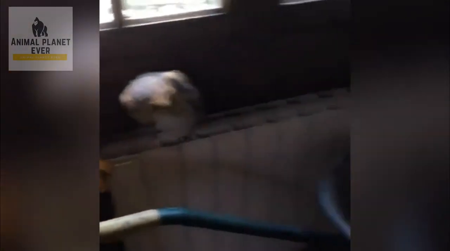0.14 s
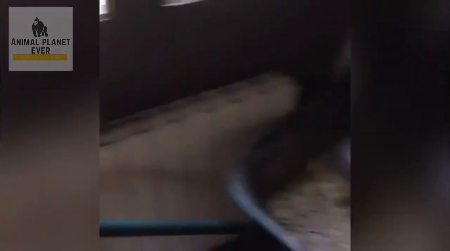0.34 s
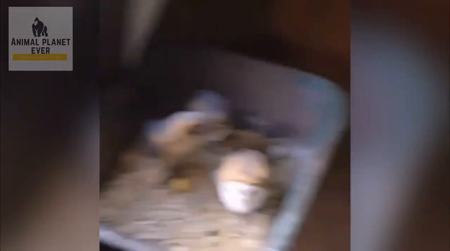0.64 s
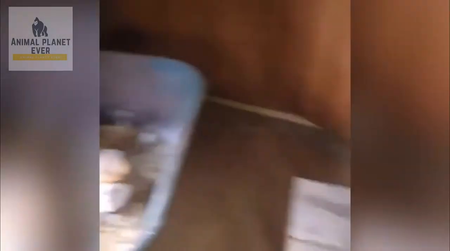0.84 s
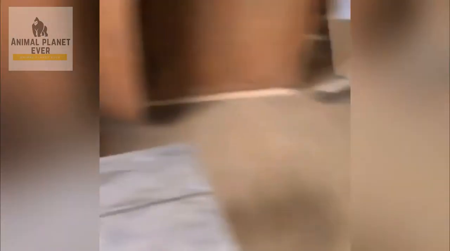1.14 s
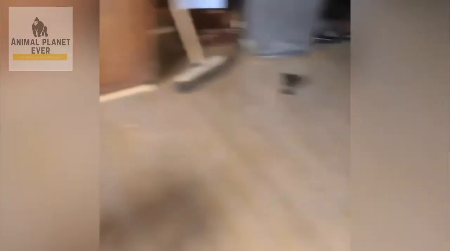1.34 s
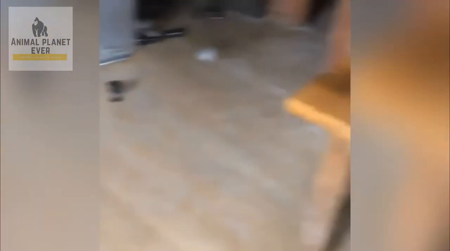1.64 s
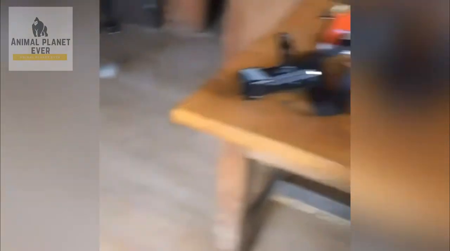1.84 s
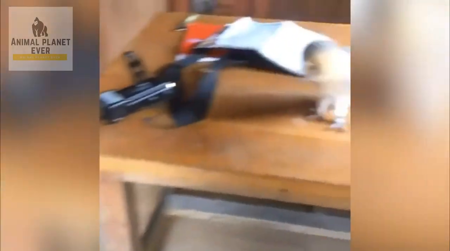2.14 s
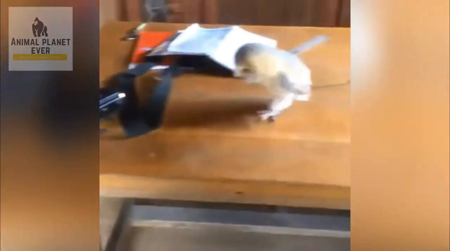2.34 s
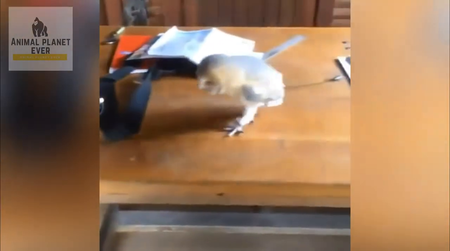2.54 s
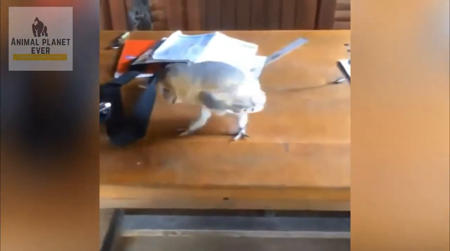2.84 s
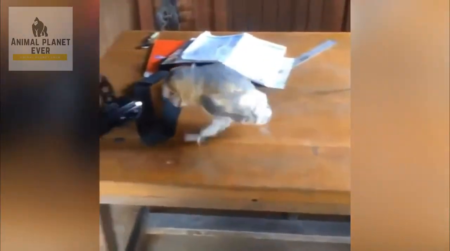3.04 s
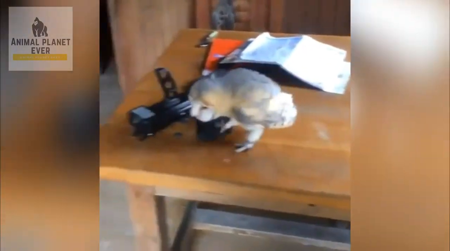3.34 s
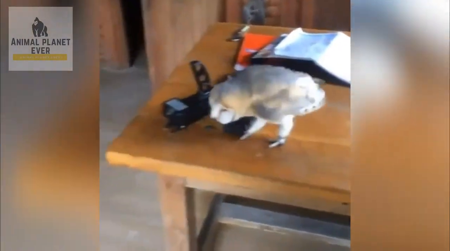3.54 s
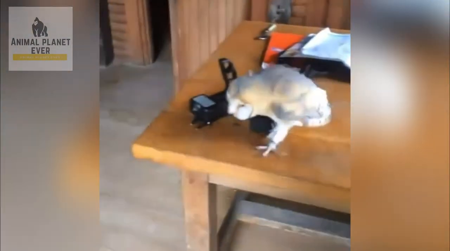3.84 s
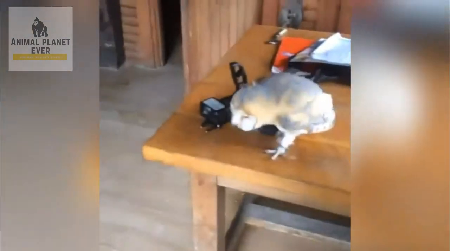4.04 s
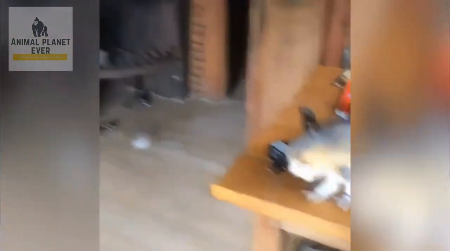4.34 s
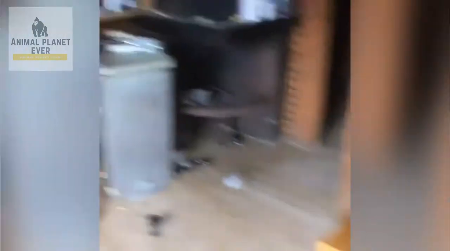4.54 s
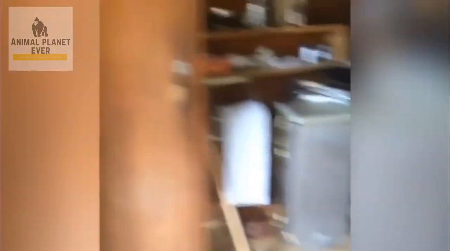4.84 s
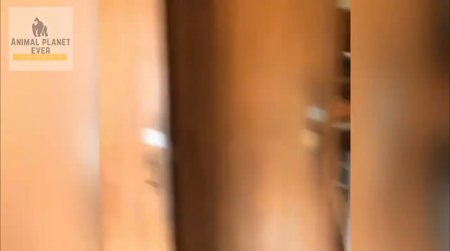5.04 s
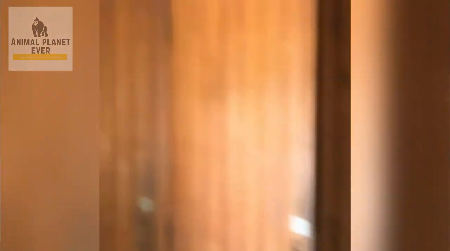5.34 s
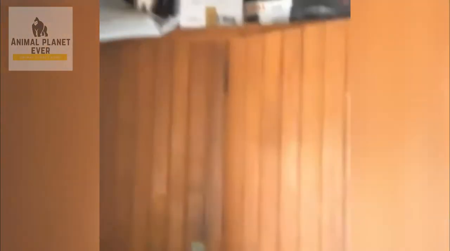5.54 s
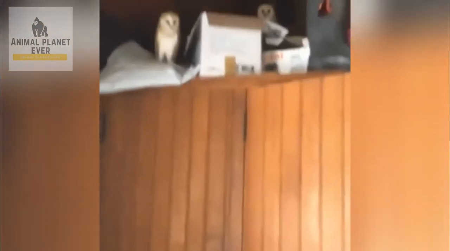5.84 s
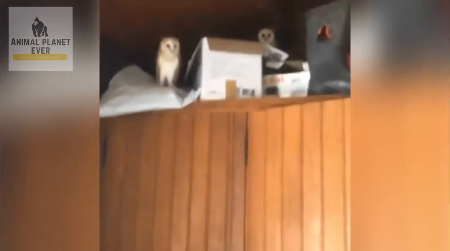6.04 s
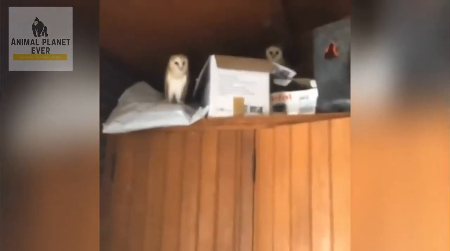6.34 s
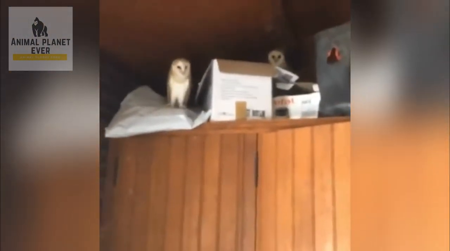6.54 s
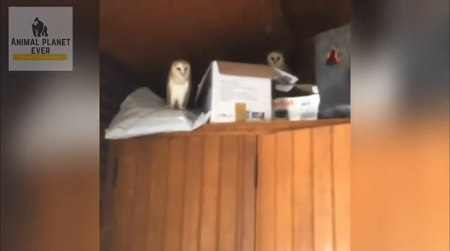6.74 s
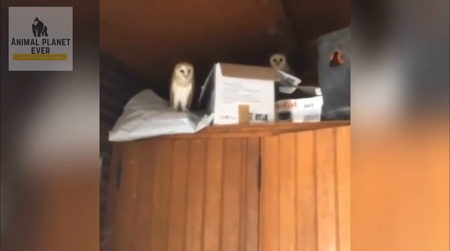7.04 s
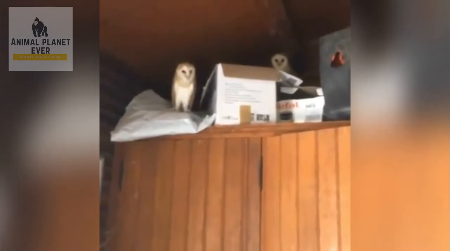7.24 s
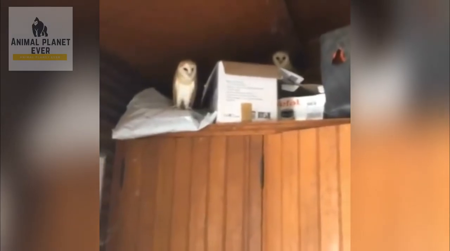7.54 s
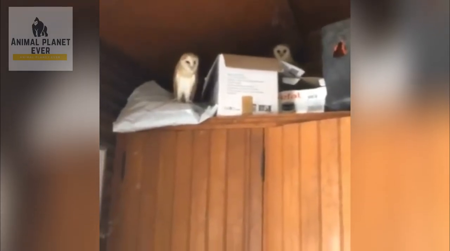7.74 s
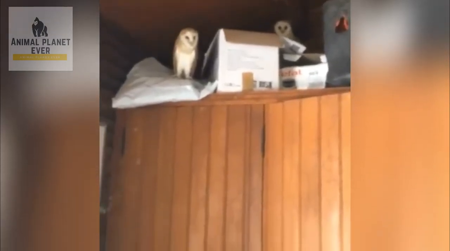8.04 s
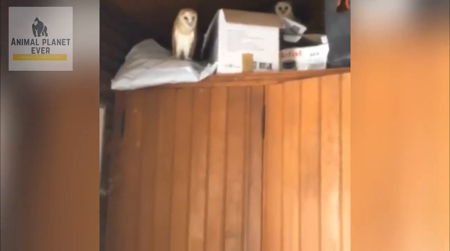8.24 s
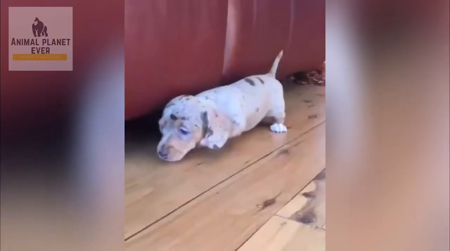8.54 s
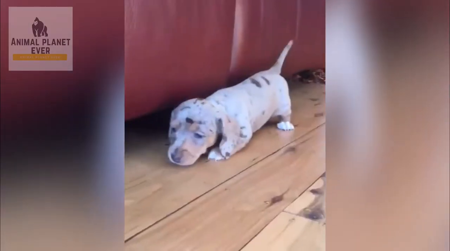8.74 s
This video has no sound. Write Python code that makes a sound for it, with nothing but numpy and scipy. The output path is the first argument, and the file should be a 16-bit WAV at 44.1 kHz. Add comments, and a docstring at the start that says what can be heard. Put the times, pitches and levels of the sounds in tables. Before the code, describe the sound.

Barn owls rasp out harsh, overlapping hisses in a small wooden room over faint rumble and handling bumps, then abrupt silence and quiet air.

```python
"""Barn owls hiss in a small wooden room over low rumble and still air, while someone walks about with a camera.
At first thin, hollow hisses alternate with full, rasping ones; later all are thin. Each is turbulent noise
shaped by throat and mouth resonances, and the boards echo it. Decaying tones bump the camera, noise bursts
make steps and a knock, and a wavering tone groans. Near the end all is cut off in mid hiss; after a silence
a quieter room follows, shaped noise in which a puppy's paw scuffs the floor."""
import sys
import numpy as np
from scipy import signal
from scipy.fft import rfft, irfft, next_fast_len
from scipy.io import wavfile
from scipy.ndimage import uniform_filter1d

SR = 44100
rng = np.random.default_rng(int(sys.argv[2]) if len(sys.argv) > 2 else 0)


def inscribe(sig):
    """Save sig as 16-bit PCM at rate SR to the path in sys.argv[1].

    A 1-D sig is mono; a 2-D sig holds one channel per row.
    Samples are clipped to [-1, 1] before scaling.
    """
    pcm = np.round(np.clip(np.atleast_2d(sig).T, -1, 1) * 32767)
    wavfile.write(sys.argv[1], SR, pcm.astype(np.int16))


N = 392049
TIME = np.arange(N) / SR


def gain_of(db):
    """Level law: decibels to an amplitude factor."""
    return 10 ** (np.asarray(db) / 20)


def evened(x):
    """Power normalization: scales to an rms of 1."""
    return x / np.sqrt(np.mean(x ** 2) + 1e-20)


def follow(rows, t):
    """Linear interpolation: the columns of a curve at the times t."""
    s, *columns = np.transpose(rows)
    return [np.interp(t, s, c) for c in columns]


def read(points, hz):
    """Spectral envelope: the gain at the frequencies hz, interpolated over log frequency."""
    f, db = np.transpose(points)
    return gain_of(np.interp(np.log(hz + 1), np.log(f + 1), db))


def filtered(x, response):
    """Linear filtering: multiplies the spectrum by a response to frequency, then sets the rms to 1."""
    size = next_fast_len(len(x) + 2048)
    spectrum = rfft(x, size) * response(np.fft.rfftfreq(size, 1 / SR))
    return evened(irfft(spectrum, size)[:len(x)])


def noise(points, count=N):
    """Coloured noise: white noise under a spectral envelope."""
    return filtered(rng.standard_normal(count), lambda f: read(points, f))


def wander(count, rate_hz):
    """Low-passed random fluctuation, up to about the given rate."""
    step = max(int(SR / (32 * rate_hz)), 1)
    white = rng.standard_normal(count // step + 2)
    coarse = filtered(white, lambda f: 1 / (1 + (f / (step * rate_hz)) ** 4))
    return np.interp(np.arange(count) / step, np.arange(len(coarse)), coarse)


def swells(t, s, height, width):
    """Gaussian envelope: a smooth rise and fall around the time s."""
    return height * np.exp(-((t - s) / width) ** 2)


def placed(sound, start_s):
    """Time shift: sets a sound at its start in the full length."""
    return np.pad(sound, (round(start_s * SR), N))[:N]


# spectrum of the rumble before the room: (frequency [Hz], spectral density [dB])
RUMBLE_SPECTRUM = [(25, -37), (54, -6.5), (85, -6.5), (125, -4), (200, -5.5), (270, -6.5), (400, -13.5),
                   (600, -29), (1500, -39)]
# low resonances of the room: (frequency [Hz], width [Hz], level [dB])
ROOM_MODES = [(55.1, 10, 0.5), (119.2, 5, 7), (134.2, 6.6, 3), (184.2, 7.2, 7.5), (366, 18, 6.5),
              (645, 12, 2)]
# swells and lulls of the rumble: (time [s], level change [dB], half width [s])
SHUFFLES = [(1.185, -19, .06), (1.78, 4, 0.17), (2.25, 5, 0.075), (2.55, -5, 0.079), (3.8, 3, 0.36),
            (4.5, 1.5, .15), (4.95, 6.5, 0.33), (5.44, 7.5, 0.083), (5.97, -7, .08), (6.52, 7, .08),
            (7.2, -1.5, 0.21), (8.2, 4.5, 0.29)]


def rumble(mean_db=-64.5, sway_db=2.3):
    """Modal resonance: low noise of someone moving about, coloured by the room's resonances."""
    def boom(f):
        return 1 + sum(gain_of(db) / (1 + (2 * (f - hz) / width) ** 2) for hz, width, db in ROOM_MODES)

    level_db = mean_db + sway_db * wander(N, rate_hz=5.3)
    level_db = level_db + sum(swells(TIME, *row) for row in SHUFFLES)
    return gain_of(level_db) * filtered(noise(RUMBLE_SPECTRUM), boom)


# hollow rumble at the start: (frequency [Hz], spectral density [dB])
LOW_RUSH_SPECTRUM = [(150, -32), (270, -8), (340, -4), (440, 1), (580, -6), (750, -14), (1500, -41.5)]


def low_rush(level_db=-62.0, rise_s=.2, start_db=-3, end_s=1.11, fade_s=.03):
    """Band-shaped noise: a faint, hollow rumble that stops at the first bump."""
    rise_db = start_db * np.exp(-TIME / rise_s)
    fade = np.clip((end_s - TIME) / fade_s, 0, 1)
    return gain_of(level_db + rise_db) * fade * noise(LOW_RUSH_SPECTRUM)


# still air of the wooden room: (frequency [Hz], spectral density [dB])
AIR_SPECTRUM = [(400, 4.5), (1100, -4.5), (4000, -6.5), (13800, -9.5)]


def air(level_db=-67):
    """Stationary noise: the steady, soft background of the wooden room."""
    return gain_of(level_db) * noise(AIR_SPECTRUM)


def rasp(force_db, spit_db, spits_per_s, rattle_db, spit_growth=0.46):
    """Turbulence: jet noise rattles the throat, and harder force strengthens its tiny pops of moisture."""
    count = len(force_db)
    struck = rng.random(count) < spits_per_s / SR
    pops = struck * rng.choice([-1, 1], count) * rng.uniform(0.267, 1, count)
    # spit_db holds at a force of -22 dB; spit_growth is in dB per dB of force
    spit = gain_of(spit_db + spit_growth * (force_db + 22)) * evened(pops)
    jet = rng.standard_normal(count) + spit
    flutter_db = .6 * wander(count, rate_hz=55)
    return jet * gain_of(flutter_db + rattle_db * wander(count, rate_hz=740))


def near_walls(x, strength, dull_hz=2800, latest_s=.02, count=12):
    """Comb filtering: early echoes off boards and shelves colour each hiss; clutter scatters their treble."""
    delays = rng.uniform(.003, latest_s, count)
    heights = strength * rng.choice([-1, 1], count) / np.sqrt(count)
    echoes = sum(h * np.roll(x, round(d * SR)) for d, h in zip(delays, heights))
    return x + signal.lfilter(*signal.butter(1, dull_hz, fs=SR), echoes)


def wavering(x, hz, width):
    """Drifting resonance, as the throat moves: heterodyned down, smoothed twice and shifted back."""
    drift = 1 + .025 * wander(len(x), rate_hz=6)
    turn = np.exp(2j * np.pi * np.cumsum(hz * drift) / SR)
    r = np.exp(-2 * np.pi * width / SR)
    smooth = signal.lfilter([(1 - r) ** 2], [1, -2 * r, r * r], x / turn)
    return (turn * smooth).real


def whistling(jet, modes, tuning):
    """Narrow-band resonance: each mode of the mouth catches and lets go on its own."""
    return sum(gain_of(db) * abs(wander(len(jet), rate_hz=8.8)) * wavering(jet, hz * tuning, width)
               for hz, width, db in modes)


# sudden surges and falters of force within a hiss: (time [s], level change [dB], half width [s])
SURGES = [(.1, -3, .02), (.435, 4, 0.028), (.505, -1.5, .018), (.545, 0.5, .015), (.672, 2, 0.024),
          (.89, -1.5, 0.028), (.96, 3, 0.022), (1.035, 0.5, .018), (1.19, -5, 0.023), (1.25, -0.5, 0.023),
          (1.33, 3.5, 0.021), (1.61, 2.5, 0.02), (1.72, 1.5, 0.025), (1.82, -0.5, 0.035),
          (2.165, -2.5, .018), (2.285, 1, 0.014), (3.42, -3, .02), (3.83, 0, .018), (3.98, -3, 0.051),
          (4.12, 0.5, 0.035), (4.49, -4.5, 0.031), (4.56, 0.5, 0.025), (4.63, -2.5, 0.023),
          (4.812, 2, 0.012), (4.84, -2.5, 0.01), (4.875, -1.5, 0.01), (4.905, -3.5, 0.012),
          (5.41, 2, 0.012), (5.445, -4, 0.014), (5.54, 3.5, 0.038), (5.745, -1, .012), (5.78, 1.5, 0.017),
          (6.385, -1, 0.013), (6.43, 2, 0.023), (6.55, -4, 0.023), (7.415, -2.5, .012), (7.48, 2, 0.024),
          (7.69, 3, 0.026)]


def surging(t, tremor_db=0.48, tremor_hz=21.9):
    """Amplitude modulation: surges and a tremor in dB, for the force is never quite steady."""
    return sum(swells(t, *surge) for surge in SURGES) + tremor_db * wander(len(t), rate_hz=tremor_hz)


# harsh catches, where the mouth briefly rings out: (time [s], level [dB], pitch [Hz], half width [s])
CATCHES = [(.69, -4, 4200, 0.025), (2.4, 9.5, 4200, 0.025), (3.88, -2, 3960, 0.036), (4.09, -2, 4600, .03),
           (5.685, 6, 4260, 0.018), (5.714, 12, 5060, 0.017), (5.788, 12, 5900, 0.013),
           (5.826, 7.5, 6160, 0.016)]


def catching(jet, t, start, end, width_hz=1100):
    """Transient resonance: the mouth briefly rings out in the hiss under way."""
    return sum(swells(t, s, gain_of(db), half_width) * wavering(jet, hz, width_hz)
               for s, db, hz, half_width in CATCHES if start < s < end)


# narrow rings of the gaping mouth, before tuning and growth: (frequency [Hz], width [Hz], level [dB])
RINGS = [(3880, 90, 5.5), (4087, 64, 0), (4550, 410, -6.5)]
# faint, wandering whistles of the mouth, before tuning: (frequency [Hz], width [Hz], level [dB])
WHISTLES = [(2171, 30, 6.5), (2425, 40, 1.5), (7230, 270, -11.5), (9490, 880, -1)]
BREAK_S, BREAK_DULLING = 0.0046, 0.85  # the rasp lets go this fast; edge falls further (dB per dB of drop)
EDGE_DROOP_DB = 3.5  # the beak closes a little, so each hiss dulls from start to end
EDGE_GATING = 0.23  # the edge needs fast air: it comes last, goes first (dB per dB of attack and release)
RING_GROWTH_DB = 7  # the rings grow from start to end as the beak closes
THROAT_FOLLOW = 0.31  # the throat sounds even in slow air (dB per dB of force)
THROAT_CLOSING = 0.88  # but it closes when the rasp lets go (dB per dB of the drop)
THROAT_ECHO = 0.73  # strength of the boards' echoes of the throat
THROAT_SWAY_DB = 2.03  # each throat resonance comes and goes


def hiss(row, spectrum, throat, spit_db, echo, ring_db):
    """Source and filter: a jet opens, crests and breaks off, sounding the throat, mouth and edge of the beak."""
    (start, length, attack, release, crest, crest_db, swell_db, sag_db, tail, drop_db,
     sharp_db, split_hz, top_db, hollow_db, tuning) = row
    end = start + length
    t = np.arange(max(start, 0), end, 1 / SR)
    progress = (t - start) / length

    opening = np.clip(np.minimum((t - start) / attack, (end - t) / release), 1e-3, 1)
    gate_db = 20 * np.log10(opening ** 2)
    break_db = -drop_db * (1 + np.tanh((t - end + tail) / BREAK_S)) / 2
    arch_db = gate_db + break_db - np.interp(progress, [0, crest, 1], [swell_db, 0, sag_db])
    force_db = crest_db + arch_db + surging(t)

    sharp_db = sharp_db + EDGE_GATING * gate_db + BREAK_DULLING * break_db - EDGE_DROOP_DB * (progress - .5)
    sharp_db = sharp_db + 1.24 * wander(len(t), rate_hz=22.4)  # the beak trembles

    jet = near_walls(rasp(force_db, spit_db, spits_per_s=750, rattle_db=0.2), echo)
    ring = gain_of(ring_db + RING_GROWTH_DB * (progress - 1.5)) * whistling(jet, RINGS, tuning)
    jet = jet + ring + catching(jet, t, start, end) + whistling(jet, WHISTLES, tuning)

    def below(f):
        return 1 / (1 + (f / split_hz) ** 20)

    def edge_response(f):
        treble = read([(9000, 0.0044), (12500, top_db)], f)
        return read(spectrum, f / tuning) * (1 - below(f)) * treble

    body = filtered(jet, lambda f: read(spectrum, f / tuning) * below(f))
    edge = filtered(jet, edge_response)
    sharpness = gain_of(sharp_db)
    mouth = (body + sharpness * edge) / np.hypot(1, sharpness)  # the beak shifts the colour, not the power

    hollow = 0
    for hz, width, db in throat:
        sway_db = THROAT_SWAY_DB * wander(len(t), rate_hz=9.06)
        hollow = hollow + gain_of(db + sway_db) * wavering(rng.standard_normal(len(t)), hz * tuning, width)
    throat_db = hollow_db + THROAT_FOLLOW * arch_db + THROAT_CLOSING * break_db
    sound = gain_of(force_db) * mouth + gain_of(throat_db) * evened(near_walls(hollow, THROAT_ECHO))
    return placed(sound, t[0])


# thin, hollow hisses: (start [s], length [s], attack [s], release [s], crest [share of the length],
#   force at the crest [dB], swell up to the crest [dB], sag after it [dB], dull tail [s],
#   drop into that tail [dB], sharp edge over the body [dB], where that edge begins [Hz],
#   top of the treble [dB], hollow of the throat [dB], tuning of mouth and throat [factor])
THIN_HISSES = [(-.08, 0.53, 0.076, 0.21, 0.34, -36, -3, 1, 0, 0, 3.5, 9000, 7.5, -54, 1.065),
               (1.02, 0.88, 0.21, 0.08, 0.45, -36, 2, 1, 0, 0, 5, 8950, 2.5, -53.5, 1.05),
               (2.61, 0.92, 0.17, 0.18, 0.52, -37.5, 11, 9.5, 0.11, 4, 0.5, 9600, 5.5, -54, 1.04),
               (4.2, 0.98, 0.32, 0.16, 0.58, -37, 7.5, -1, 0.09, -1, 0.5, 9800, 4, -54, 1.066),
               (5.995, 0.94, 0.17, 0.23, 0.65, -29.5, 9, 17.5, 0.19, 4, 4.5, 7700, -1, -51, 1.04),
               (7.1, 0.95, 0.19, 0.28, 0.47, -28.5, 7, 8.5, 0.147, 3.5, 5.5, 7130, -0.5, -50.5, 1.016),
               (7.96, 0.41, 0.049, .1, 0.13, -50, 10.5, 31.5, 0.052, -1, 1, 7280, 6.5, -61, 0.99),
               (8.34, 0.54, 0.098, 0.14, 0.21, -34.5, 17, 1, 0, 1.5, 8, 6900, -1, -57.5, 1.06)]
# their mouth colour before tuning: (frequency [Hz], spectral density [dB])
THIN_SPECTRUM = [(900, -36), (1500, -45), (1800, -9), (2150, -1.5), (2500, -5), (2900, -1.5), (4000, -1),
                 (5200, -3), (6940, 1.5), (9200, 0), (11000, -2), (13800, -4.5)]
# their low throat resonances before tuning: (frequency [Hz], width [Hz], level [dB])
THIN_THROAT = [(359, 94, -10), (620, 68, -6.5), (860, 135, -12), (1120, 113, -4.5), (1254, 75, 0),
               (1553, 630, -4)]


def thin_hisses():
    """Weakly ringing resonance: thin hisses with faint rings of the mouth."""
    return sum(hiss(row, THIN_SPECTRUM, THIN_THROAT, spit_db=-1.5, echo=0.79, ring_db=-17.0)
               for row in THIN_HISSES)


# full, open-mouthed hisses: the columns of the thin ones, then (ring of the mouth before growth [dB])
FULL_HISSES = [(0.201, 0.98, 0.084, 0.14, 0.35, -26.5, 8, 4, 0.12, 6, 4, 7930, 0.5, -53, 1.06, 6),
               (1.751, .92, 0.17, 0.14, 0.61, -35, 1, 8, 0.173, 7, -1, 8100, -3, -57.5, 1.01, -4),
               (3.339, 0.99, 0.17, 0.16, 0.52, -31, 13, 12.5, 0.17, 2, -3, 8160, -2.5, -56.5, 1.043, -6),
               (5.076, 1.0, 0.14, 0.29, 0.37, -25, 11, 7.5, 0.19, 5, 3.5, 7100, -2.5, -52.5, 1.045, 6)]
# their mouth colour before tuning: (frequency [Hz], spectral density [dB])
FULL_SPECTRUM = [(900, -38.5), (1500, -45.5), (1900, -13), (2350, -3.5), (2770, -5.5), (3360, -1),
                 (4050, 1.5), (4600, -1.5), (6270, -0.5), (7760, 2.5), (10200, 0), (12300, 1),
                 (13800, -9.5)]
# their low throat resonances before tuning: (frequency [Hz], width [Hz], level [dB])
FULL_THROAT = [(370, 50, -2), (494, 150, 4), (793, 190, -6), (1357, 370, -2.5), (1764, 610, 1)]


def full_hisses():
    """Strong resonance: full hisses, each with its own ring of the mouth."""
    return sum(hiss(row, FULL_SPECTRUM, FULL_THROAT, spit_db=-4, echo=0.89, ring_db=ring_db)
               for *row, ring_db in FULL_HISSES)


def shifting_colour(x, depth_db, band_hz, hold_s, size=1024):
    """Interference: narrow bands come and go as birds turn and the microphone moves among the echoes."""
    z = signal.stft(x, nperseg=size)[2]
    field = rng.standard_normal(z.shape)
    for axis, width in enumerate([band_hz * size / SR, hold_s * SR / (size / 2)]):
        for _ in range(2):
            field = uniform_filter1d(field, max(round(width), 1), axis)
    gains = evened(gain_of(depth_db * evened(field)))
    return signal.istft(z * gains, nperseg=size)[1][:N]


def room(x, t60):
    """Reverberation: the short, exponentially decaying diffuse tail of the wooden room."""
    t = np.arange(SR // 2) / SR
    tail = rng.standard_normal(len(t)) * gain_of(-60 * t / t60) * (t > .008)
    return signal.fftconvolve(x, tail / np.linalg.norm(tail))[:N]


# bumps on the camera: (time [s], peak level [dB], pitch [Hz], decay time either side [s])
BUMPS = [(1.093, -50, 170, 0.0042), (1.093, -39, 400, 0.00068), (1.9995, -30, 574, 0.00074),
         (2.114, -38, 430, 0.002), (7.406, -44.5, 332, 0.004), (7.547, -45.5, 212, 0.007),
         (7.586, -48.5, 198, 0.0096)]


def bumps():
    """Damped oscillation: dull bumps on the camera's case."""
    return sum(gain_of(db) * np.exp(-abs(TIME - s) / decay) * np.cos(2 * np.pi * hz * (TIME - s))
               for s, db, hz, decay in BUMPS)


# soft steps: (time [s], level [dB], centre frequency [Hz], half width [s])
FOOTFALLS = [(1.84, -62, 65, .05), (5.42, -52, 65, 0.067), (6.5, -57, 65, .07), (7.32, -53, 85, .035)]


def footfalls():
    """Impact noise: soft steps thud through the floor as low bursts."""
    return sum(swells(TIME, s, gain_of(db), width) * noise([(hz / 2, -20), (hz, 0), (hz * 2, -20)])
               for s, db, hz, width in FOOTFALLS)


# knock on the wooden table: (frequency [Hz], spectral density [dB])
KNOCK_SPECTRUM = [(40, -9), (150, -2), (280, -8), (450, -6), (720, -15), (1400, -16), (3000, -30)]


def knock(at_s=2.112, peak_db=-46, decay_s=0.028, tail_db=-11, tail_s=0.076):
    """Double exponential decay: a sudden knock on wood and its short clatter."""
    t = np.arange(SR // 2) / SR
    fade = np.exp(-t / decay_s) + gain_of(tail_db) * np.exp(-t / tail_s)
    return placed(gain_of(peak_db) * fade * noise(KNOCK_SPECTRUM, len(t)), at_s)


# a low rubbing groan: (time [s], mean pitch [Hz], level of the fundamental [dB])
GROAN = [(2.132, 105, -60), (2.146, 118, -46), (2.193, 138, -44.5), (2.2, 138, -56), (2.38, 115, -66)]


def groan():
    """Frequency modulation: a rub on the camera, its wavering pitch rising and then sinking."""
    hz, level_db = follow(GROAN, TIME)
    turns = np.cumsum(hz * (1 + 0.056 * wander(N, rate_hz=63.4))) / SR
    tone = np.sin(2 * np.pi * turns) + 0.18 * np.sin(4 * np.pi * turns)
    return gain_of(level_db) * tone * (TIME > GROAN[0][0]) * (TIME < GROAN[-1][0])


def puff(at_s=6.9, half_width_s=0.025, peak_db=-60):
    """Noise burst: one tiny puff of air in the pause between two hisses."""
    return swells(TIME, at_s, gain_of(peak_db), half_width_s) * noise(THIN_SPECTRUM)


# throat of the weakest hiss: (frequency at the crest [Hz], width [Hz], level [dB])
SIGH_THROAT = [(1060, 250, 3.5), (2140, 830, -2)]


def sigh(crest_s=8.12, half_width_s=0.13, crest_db=-57.0, sink_per_s=0.56):
    """Gliding resonance: the weakest hiss trails off in the owl's throat, whose resonances sink."""
    t = np.arange(crest_s - .5, crest_s + .5, 1 / SR)
    sinking = np.exp(-sink_per_s * (t - crest_s))
    breath = sum(gain_of(db) * wavering(rng.standard_normal(len(t)), hz * sinking, width)
                 for hz, width, db in SIGH_THROAT)
    return placed(swells(t, crest_s, gain_of(crest_db), half_width_s) * evened(breath), t[0])


# still air of the quieter room: (frequency [Hz], spectral density [dB])
QUIET_SPECTRUM = [(25, -16), (90, -9), (320, -8.5), (450, -16.5), (2300, -23.5), (3100, -22.5), (6000, -26),
                  (13800, -38)]
# paw on the floor: (frequency [Hz], spectral density [dB])
SCUFF_SPECTRUM = [(3000, -18), (5500, -5), (8000, -12), (13000, -16.5)]


def quiet_room(level_db=-64.5, scuff_s=8.77, half_width_s=0.012):
    """Friction noise over stationary noise: one soft scuff of a paw in still air."""
    scuff = swells(TIME, scuff_s, gain_of(-56), half_width_s) * noise(SCUFF_SPECTRUM)
    return gain_of(level_db) * noise(QUIET_SPECTRUM) + scuff


def scene(cut_s=8.483, resume_s=8.622):
    """Superposition: the owls' room up to the cut, a moment of silence, then the quiet room."""
    owls = thin_hisses() + full_hisses() + puff() + sigh()
    owls = shifting_colour(owls, depth_db=1.8, band_hz=130, hold_s=.1)
    background = rumble() + low_rush() + air()
    contacts = bumps() + footfalls() + knock() + groan()
    shed = owls + gain_of(-31.0) * room(owls, t60=.14) + background + contacts
    return (shed * (TIME < cut_s) + quiet_room() * (TIME > resume_s))[None]


def record(dry, edge_hz=14000):
    """Band limitation: a steep linear-phase low-pass removes the highest treble."""
    low_pass = signal.firwin(1023, edge_hz, window=("kaiser", 8), fs=SR)
    return signal.oaconvolve(dry, low_pass[None], "same")


dry = scene()
out = record(dry)
inscribe(out)
```